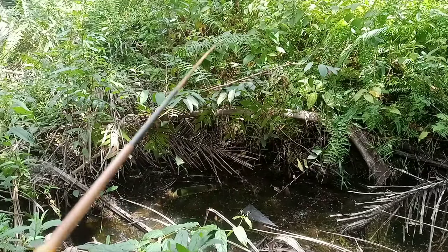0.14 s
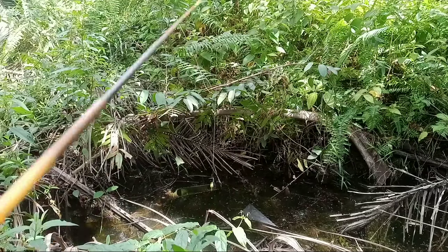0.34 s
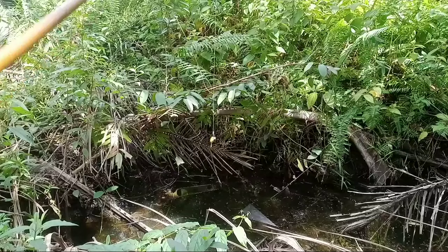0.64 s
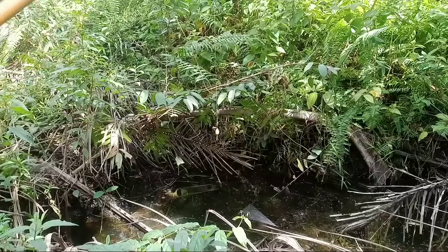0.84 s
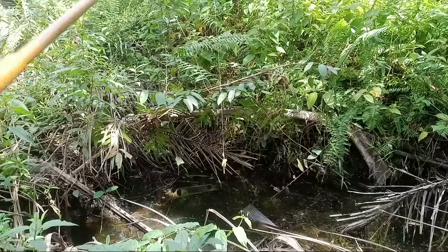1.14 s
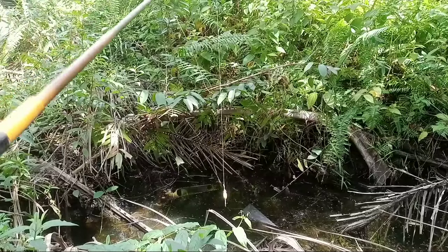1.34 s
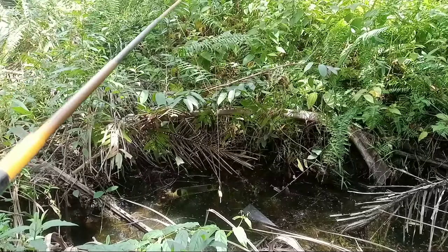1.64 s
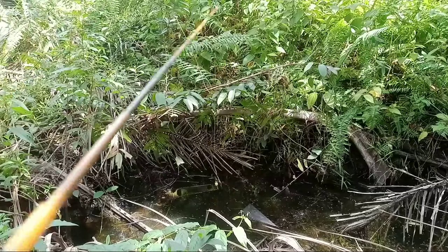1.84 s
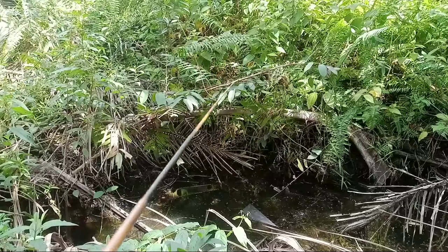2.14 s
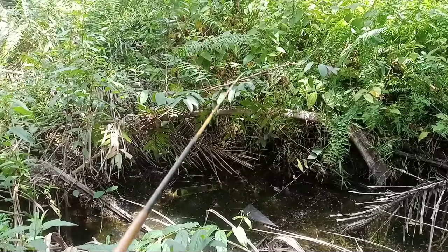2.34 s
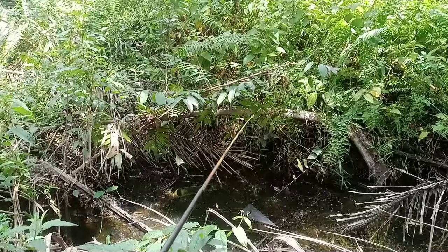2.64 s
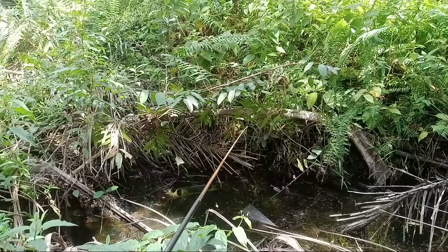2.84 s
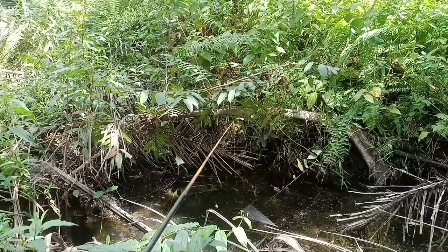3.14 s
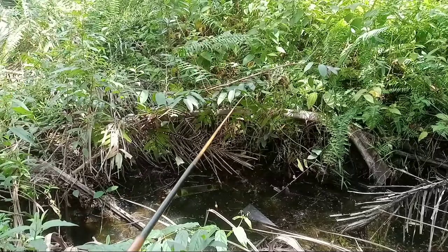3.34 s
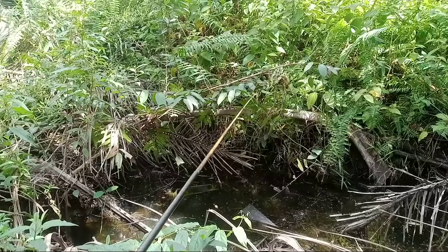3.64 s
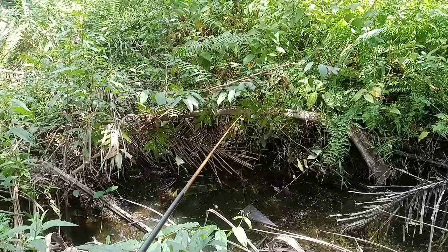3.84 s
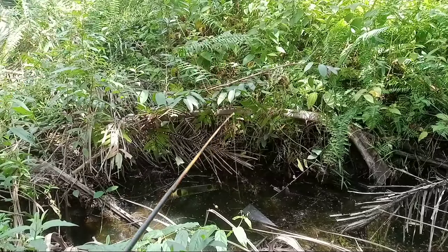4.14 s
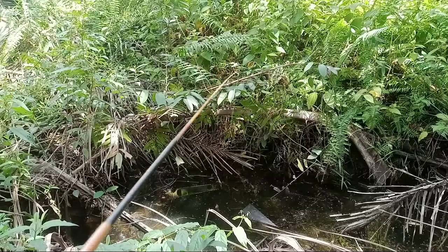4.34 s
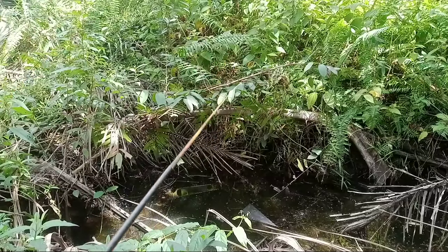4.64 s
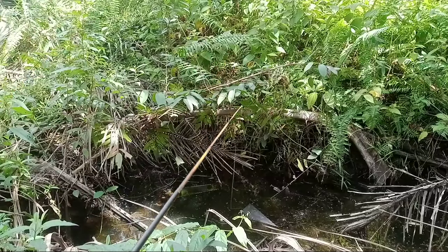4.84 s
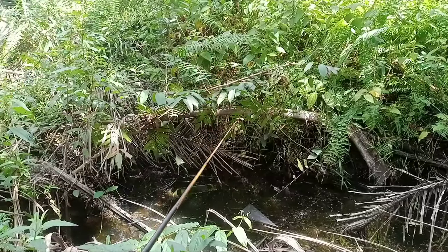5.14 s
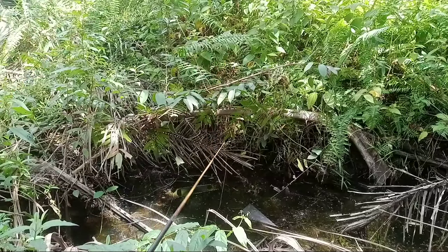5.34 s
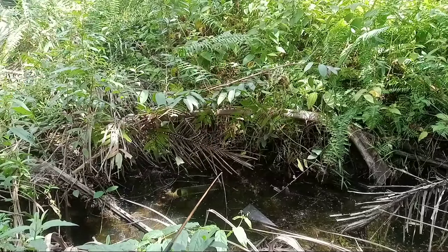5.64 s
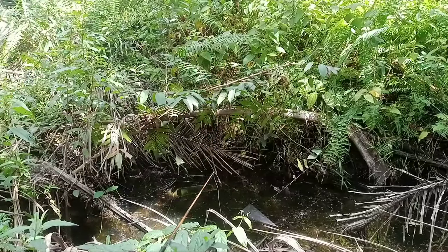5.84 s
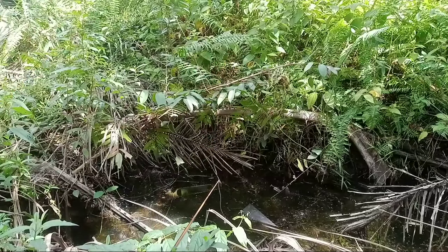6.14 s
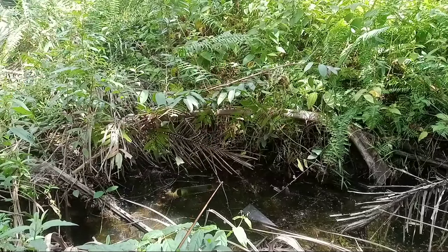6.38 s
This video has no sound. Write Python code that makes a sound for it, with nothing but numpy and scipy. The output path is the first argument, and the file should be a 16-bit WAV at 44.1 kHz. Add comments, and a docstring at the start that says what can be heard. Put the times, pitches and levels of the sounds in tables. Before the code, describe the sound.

Throughout the six and a half seconds, a dense chorus of crickets shimmers at very high pitch, with a nearer one chirring in rapid pulses. Another trill swells in phrases, restarting around 0.6, 3 and 5 s, and a faint, even higher buzz swells and stops about twice a second. Beneath lie soft air hiss, barely stirring leaves and a far-off engine's low thudding, strongest near 1.7 s. Small dry ticks of twigs and rod start at once, cluster around 1.3 to 1.6 s and 3.1 to 3.7 s, and peak in a sharp snap at 4.8 s, then continue lightly to 6.1 s. A tiny drip at 0.3 s is followed by a clearer rising plop at 2.15 s. A nearby frog gives three short, raspy croaks at 2.0, 2.2 and 2.35 s, echoing off the banks. Three blurred, distant croaks answer at 5.6, 5.75 and 5.9 s.

```python
"""Crickets trill in crowds by a swamp pool under bushes, and a few near ones stand out: falling tone strokes in trains.
A frog croaks three times close by and another answers from afar: pulse trains ring a throat resonance.
A drop plops as rising bubbles, twigs and rod tick as short damped rings, and leaves stir as patchy noise bands.
A slow engine thuds far off through a low resonance, over coloured noise for the still air."""
import sys
import numpy as np
from scipy import signal
from scipy.fft import rfft, irfft, next_fast_len
from scipy.io import wavfile
from scipy.ndimage import uniform_filter1d

SR = 44100
rng = np.random.default_rng(int(sys.argv[2]) if len(sys.argv) > 2 else 0)


def store_wav(level_fs):
    """Save 16-bit WAV to argv[1]."""
    pcm = np.round(np.clip(np.atleast_2d(level_fs), -1, 1) * 32767)
    wavfile.write(sys.argv[1], SR, pcm.T.astype(np.int16))


N = 287072


def undb(db):
    """Decibel law: amplitude ratio of a level in dB."""
    return 10 ** (np.asarray(db) / 20)


def level(x, db):
    """Effective value: scales a signal to an RMS level in dB."""
    return x * undb(db) / np.sqrt(np.mean(x ** 2))


def decay(t60):
    """Exponential decay: an envelope that loses 60 dB in t60 seconds, and its time axis."""
    t = np.arange(int(t60 * SR)) / SR
    return t, np.exp(-np.log(1000) * t / t60)


def columns_of(*values, count):
    """Broadcasting: each value as a column with one entry per event."""
    return [np.broadcast_to(v, count)[:, None] for v in values]


def place(starts, waves):
    """Superposition: sums short waves (one a row) at their start times in seconds."""
    at = np.round(np.asarray(starts) * SR).astype(int)[:, None] + np.arange(waves.shape[1])
    inside = (at >= 0) & (at < N)
    return np.bincount(at[inside], waves[inside], N)


def rings(starts, hz, size, t60, glide=0., rise=0.26):
    """Damped resonance, struck at each start; glide = relative pitch rise per second, rise = cycles of attack."""
    hz, size, t60 = columns_of(hz, size, t60, count=len(starts))
    t = np.arange(int(t60.max() * SR)) / SR
    attack = 1 - np.exp(-t * hz / rise)
    damping = np.exp(-np.log(1000) * t / t60)
    phase = 2 * np.pi * hz * (t + glide * t * t / 2)
    return place(starts, size * attack * damping * np.sin(phase))


def strokes(starts, from_hz, to_hz, length, size, overtone):
    """Stridulation: the toothed file slows down, so each tone falls; the wing adds the octave."""
    from_hz, to_hz, size, overtone = columns_of(from_hz, to_hz, size, overtone, count=len(starts))
    samples = int(length * SR)
    u = np.arange(samples) / samples
    cycles = length * (from_hz * u + (to_hz - from_hz) * u * u / 2)
    phase = 2 * np.pi * (cycles + rng.random((len(starts), 1)))
    wave = np.sin(phase)
    octave = 2 * wave * np.cos(phase)
    return place(starts, size * np.sin(np.pi * u) ** 2 * (wave + overtone * octave))


def band(x, hz, width):
    """Band-pass filtering: keeps a band of the given middle and width in Hz."""
    edges = [hz - width / 2, hz + width / 2]
    return signal.sosfilt(signal.butter(2, edges, "bandpass", fs=SR, output="sos"), x)


def scatter(x, t60):
    """Diffuse reflection: leaves and banks smear a sound into a decaying noise tail."""
    t, envelope = decay(t60)
    tail = rng.standard_normal(len(t)) * envelope
    return signal.fftconvolve(x, tail / np.sqrt(np.sum(tail ** 2)))[:N]


def drift(x, t60, size=8192):
    """Time-varying scattering: leaves and air move, so each short stretch (size in samples) gets its own tail."""
    t, envelope = decay(t60)
    out, padded = np.zeros(N + 3 * size + len(t)), np.pad(x, size)
    for at in range(0, N + size, size // 2):
        tail = rng.standard_normal(len(t)) * envelope
        part = padded[at:at + size]
        window = np.sin(np.pi * np.arange(len(part)) / size)
        wet = signal.fftconvolve(part * window, tail)
        out[at:at + len(wet)] += wet
    # the smeared sound keeps the RMS of the dry one
    return level(out[size:size + N], 0) * np.sqrt(np.mean(x ** 2))


def walk(rate):
    """Low-passed noise: slow chance of RMS 1, drawn anew rate times a second and smoothed."""
    k = int(SR / rate)
    steps = np.repeat(rng.standard_normal(N // k + 1), k)
    return level(uniform_filter1d(uniform_filter1d(steps, k), k)[:N], 0)


def near_crickets(waver_s=.0012, scatter_db=4.0, waver_hz=62.0, wet=0.23):
    """Stridulation of single crickets: four strokes a group, with tempo, pitch and force wavering."""
    # Each row: groups a second, first stroke in seconds, start and end pitch in Hz, stroke length in seconds,
    # level in dB, overtone in dB, and the levels of the four strokes of a group in dB.
    singers = [(21.11, 0.0034, 7500, 6706, 0.0073, -44, -20, (-24.5, -17.5, 4, 6.5)),
               (19.48, -0.012, 6820, 6380, .0075, -56, -18.5, (-5.5, -5.5, -6, -16))]
    out = 0
    for rate, first, from_hz, to_hz, length, db, overtone_db, pattern in singers:
        starts = first + np.arange(600) / (len(pattern) * rate)
        starts = starts + waver_s * walk(1.5)[np.clip(starts * SR, 0, N - 1).astype(int)]
        force, pitch = rng.standard_normal((len(starts), 2)).T
        size = undb(np.resize(pattern, len(starts)) + scatter_db * force)
        shift = waver_hz * pitch
        dry = strokes(starts, from_hz + shift, to_hz + shift, length, size, undb(overtone_db))
        out = out + level(dry + wet * drift(dry, 0.14), db)
    return out


def crowds(count=12, near_db=2.5, tempo=.04, rest_db=-12, wet=0.47):
    """Incoherent chorus: each singer has its own pitch, tempo and distance; every fourth stroke is weak."""
    # Each row: middle pitch, spread and fall in Hz, stroke length in seconds, strokes a second.
    choirs = [(6940, 255, 600, .007, 84), (7560, 170, 500, .007, 88), (4685, 120, 260, .008, 70),
              (5740, 380, 400, .006, 90)]
    # Each row, one per crowd: level in dB before a slow waver, overtone in dB at the middle pitch,
    # overtone rise in dB per kHz.
    strengths = [(-37, -30.5, 18.5), (-48.5, -11, 4.5), (-55, -59, 5), (-54.5, -59.5, -3.5)]
    out = 0
    for (hz, spread, fall, length, rate), (db, overtone_db, rise_db) in zip(choirs, strengths):
        own = rng.standard_normal((count, 3))
        offset = spread * np.linspace(-1.7, 1.7, count)[:, None]
        k = np.arange(660)
        starts = k / (rate * (1 + tempo * own[:, :1])) - .2 * rng.random((count, 1))
        pitch = hz + offset + 0 * starts  # one value per stroke
        # singers far from the middle pitch are weaker
        size = undb(near_db * own[:, 1:2] - 2.47 * (offset / spread) ** 2 + rest_db * (k % 4 == 0))
        overtone = undb(overtone_db + rise_db * (pitch - hz) / 1000)
        starts, pitch, size, overtone = (v.ravel() for v in (starts, pitch, size, overtone))
        dry = strokes(starts, pitch + fall / 2, pitch - fall / 2, length, size, overtone)
        mix = (1 - wet) * dry + wet * drift(dry, 0.64)
        out = out + level(mix, db) * undb(0.23 * walk(3.48))
    return out


def trill(gain, rate, from_hz, to_hz, length, wet=0.37):
    """Amplitude modulation: a nearly even train of strokes, rate a second, follows a gain curve."""
    starts = np.arange(1100) / rate + .00015 * rng.standard_normal(1100)
    size = undb(0.9 * rng.standard_normal(1100))
    dry = strokes(starts, from_hz, to_hz, length, size, 0.)
    return level((1 - wet) * dry + wet * drift(dry, 0.34), 0) * gain


def swelling_triller(from_db=-64, to_db=-49, swell_s=0.54, soft_db=-55):
    """Crescendo in level: each phrase swells, drops to a softer hold if it lasts that long, then stops."""
    # Each row: start, drop to the soft hold, and end in seconds.
    swell_times = [(-0.5, -.2, .73), (0.6, 2.0, 2.7), (3, 5, 4.78), (5, 6.42, 7.1)]
    t, gain = np.arange(N) / SR, 0
    for start, drop, end in swell_times:
        rise_db = from_db + (to_db - from_db) * np.clip((t - start) / swell_s, 0, 1)
        gain = gain + (t > start) * (t < end) * undb(np.where(t < drop, rise_db, soft_db))
    return trill(uniform_filter1d(gain, size=800), 84.82, 8220.0, 7830.0, .009)


def engine(firings_a_second=20.25, scatter_db=2.0, waver=0.01176):
    """Pulse-excited resonance: each firing thuds through a low pipe; distance smears the thuds, and they waver."""
    # Each row: time in seconds, level in dB about which the thuds waver.
    loudness = [(0, -72), (.7, -72.5), (1.1, -67.5), (1.7, -63.5), (2.5, -70), (3.3, -72), (3.6, -67.5),
                (4.7, -68.5), (5.5, -72.5), (6.2, -67.5), (6.51, -72.5)]
    turns = np.cumsum(firings_a_second * (1 + waver * walk(2.7))) / SR
    starts = np.flatnonzero(np.diff(np.floor(turns))) / SR
    size = undb(scatter_db * rng.standard_normal(200))[:len(starts)]
    thuds = band(band(rings(starts, 110.3, size, .06), 108., 104.0), 110., 130.)
    s, db = np.transpose(loudness)
    level_db = np.interp(np.arange(N) / SR, s, db)
    return level(thuds + .5 * drift(thuds, 0.39), 0) * undb(level_db + 1.5 * walk(8.))


def air(level_db=-59):
    """Spectral shaping: still air, leaves and hiss as noise of a given colour, its level heaving a little."""
    # Each row: frequency in Hz, relative spectral density in dB per Hz.
    colour = [(20, -19), (45, -8), (110, 1), (250, -7.5), (500, -12.5), (1000, -16), (2500, -18),
              (4000, -17.5), (8600, 1), (9600, -19.5), (10300, -45), (12000, -28.5), (13500, -37)]
    hz, db = np.transpose(colour)
    size = next_fast_len(N)
    f = np.maximum(np.arange(size // 2 + 1) * SR / size, 1)
    spectrum = rfft(rng.standard_normal(size)) * undb(np.interp(np.log(f), np.log(hz), db))
    return level(irfft(spectrum, size)[:N], level_db) * undb(0.59 * walk(3.83))


def leaves(level_db=-88., patchy_db=3.5):
    """Modulated band noise: leaves stir in short patches, each half-octave step on its own."""
    out = 0
    for hz in 600 * np.sqrt(2) ** np.arange(6):
        rustle = level(band(rng.standard_normal(N), hz, hz / 3), level_db)
        out = out + rustle * undb(patchy_db * walk(30))
    return out


def twigs(count=150, rustle_db=-70.0, tail_db=2.5, t60=0.01):
    """Impact excitation: ticks are short rings with a little tail; fainter ones fall by chance; one snap is broad."""
    # Each row: time in seconds, size in dB before filtering, pitch in Hz.
    taps = [(0.0235, -53.5, 1430), (0.7289, -56, 1770), (1.2645, -52.5, 1390), (1.423, -57, 2320),
            (1.5725, -58.5, 1600), (3.1188, -52, 3080), (3.3767, -55.5, 3150), (3.5523, -54.5, 2900),
            (3.6137, -59, 2990), (3.7249, -57.5, 3010), (4.3091, -57.5, 3140), (4.584, -50.5, 1900),
            (4.7045, -57.5, 1690), (4.777, -45.5, 3950), (5.051, -54, 2550), (5.1961, -57.5, 1284),
            (5.5704, -59.5, 3350), (5.7518, -50, 1630), (5.9217, -60.5, 3000), (6.095, -52, 1640)]
    s, db, hz = np.transpose(taps)
    ticks = rings(s, hz, undb(db), t60, rise=0.082) + rings(s, 1.4 * hz, undb(db - 2.5), 0.63 * t60)
    when, pitch, force = rng.random((count, 3)).T
    size = undb(rustle_db - tail_db * np.log(1 - force))
    faint = rings(when * N / SR, 900. * 4.2 ** pitch, size, t60)
    snap = rings([4.796], 11000., undb(-53), 0.00066)  # so short that its spectrum is broad
    dry = band(ticks + faint, 2730.0, 3000.0) + snap
    return dry + 0.98 * drift(dry, 0.098)


def buzzer(from_db=-88.5, to_db=-74.5, bend=.6):
    """Crescendo in level: each phrase of a high, fast trill swells, then stops short."""
    # Each row: start and end of a phrase in seconds.
    buzz_times = [(0.062, 0.54), (.66, 1.07), (1.22, 1.68), (1.82, 2.31), (2.414, 2.91), (3.033, 3.47),
                  (3.62, 4.138), (4.26, 4.735), (4.832, 5.316), (5.46, 6), (6.057, 6.8)]
    t, gain = np.arange(N) / SR, 0
    for start, end in buzz_times:
        u = (t - start) / (end - start)
        swell_db = from_db + (to_db - from_db) * np.clip(u, 0, 1) ** bend
        gain = gain + (u > 0) * (u < 1) * undb(swell_db)
    return trill(uniform_filter1d(gain, size=800), 155.8, 11650.0, 11220.0, 0.0045)


def drops():
    """Bubble resonance: trapped air rings with rising pitch, and the banks scatter it."""
    # Each row: time in seconds, starting pitch in Hz, size in dB before filtering, 60 dB decay time in seconds.
    bubbles = [(.262, 580, -54, 0.044), (2.143, 750, -39.5, 0.081), (2.157, 1206, -43, 0.037),
               (2.167, 940, -46, 0.045)]
    s, hz, db, t60 = np.transpose(bubbles)
    plops = band(rings(s, hz, undb(db), t60, glide=0.7, rise=0.91), 990.0, 850.0)
    return plops + 0.59 * scatter(plops, 0.2)


def croaks(table, rate=430, jitter=.3, scatter_db=3.0, fade=3.5, waver=.02, swell_db=0.):
    """Source and filter: uneven pulses ring the throat, whose resonances sink at the end; the sac radiates no bass."""
    # Each row, a resonance of throat and sac: start and end pitch in Hz, start and end level in dB,
    # 60 dB decay time in seconds.
    throat = [(1622, 1110, -1.5, -1, 0.012), (2170, 1700, -2, -15.5, 0.0077),
              (2820, 2400, 1.5, -13.5, 0.0048), (3530, 3310, -1, -4.5, 0.0081),
              (4460, 2100, -6.5, -28, 0.0066)]
    out = 0
    for start, length, db in table:
        timing, force, pitch = rng.standard_normal((40, 3)).T
        t = np.cumsum(np.exp(jitter * timing) / rate)
        t = t - t[0]
        u = np.minimum(t / length, 1)
        size = undb(scatter_db * force - swell_db * (1 - u)) * (u < 1)
        sink = u ** fade
        croak = 0
        for from_hz, to_hz, from_db, to_db, t60 in throat:
            hz = (from_hz + (to_hz - from_hz) * sink) * (1 + waver * pitch)
            croak = croak + rings(start + t, hz, size * undb(from_db + (to_db - from_db) * sink), t60)
        out = out + undb(db) * croak / np.sqrt(np.sum(croak ** 2) / (length * SR))
    return signal.sosfilt(signal.cheby2(5, 45, [920, 6300], "bandpass", fs=SR, output="sos"), out)


def near_frog():
    """Frequency-dependent reverberation: croaks close by, with band-wise echoes from the banks."""
    # Each row: start and length in seconds, level in dB before the sac filter.
    calls = [(2.028, 0.043, -34.5), (2.184, 0.036, -34), (2.346, 0.044, -36)]
    # Each row, an echo band: middle and width in Hz, gain in dB, 60 dB decay time in seconds.
    banks = [(1490, 740, -12.5, 0.29), (2400, 700, -5, 0.29), (3210, 405, 4, 0.43), (3920, 1600, -6, 0.34)]
    near = croaks(calls)
    return near + sum(undb(db) * band(scatter(near, t60), hz, width) for hz, width, db, t60 in banks)


def far_frog():
    """Diffuse reflection: the answers swell by themselves and arrive only smeared through the bushes."""
    # Each row: start and length in seconds, level in dB before smearing and filtering.
    answers = [(5.59, 0.052, -50), (5.755, 0.047, -48), (5.925, 0.059, -50)]
    far = drift(croaks(answers, swell_db=9.0), .3, size=1024)
    return band(far, 3250.0, 670.0) + undb(-10.5) * band(far, 1650., 120.)


def scene():
    """Superposition: all sources add linearly into one channel."""
    insects = near_crickets() + crowds() + swelling_triller() + buzzer()
    surroundings = engine() + air() + leaves() + twigs() + drops()
    return (insects + surroundings + near_frog() + far_frog())[None]


def record(dry, top_hz=15440):
    """Low-pass filtering: the top is cut steeply."""
    return signal.sosfilt(signal.ellip(12, .2, 60, top_hz, fs=SR, output="sos"), dry)


dry = scene()
out = record(dry)
store_wav(out)
```